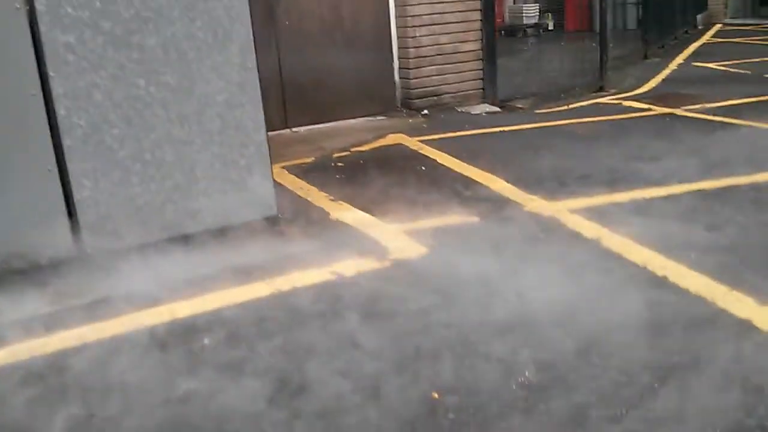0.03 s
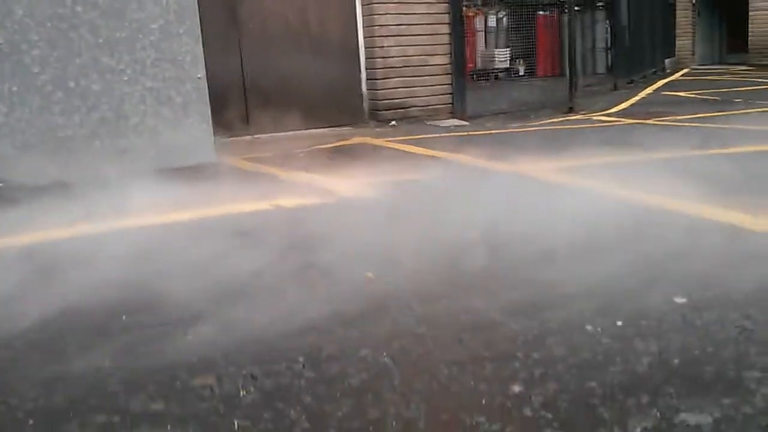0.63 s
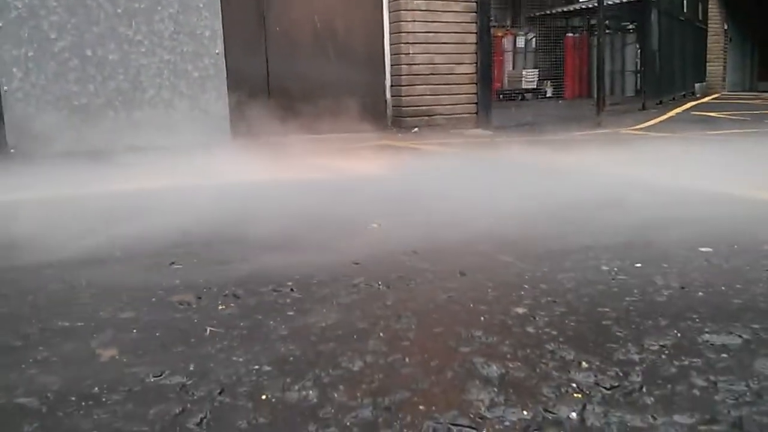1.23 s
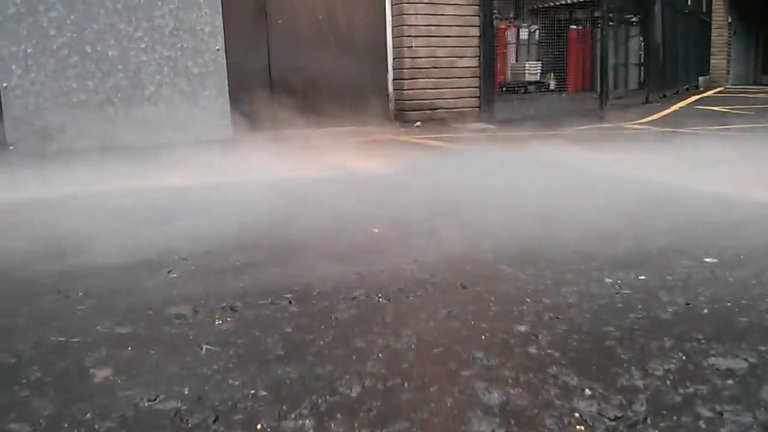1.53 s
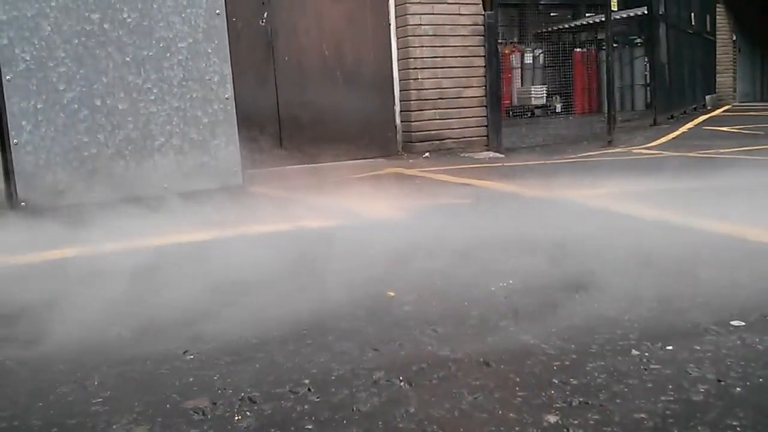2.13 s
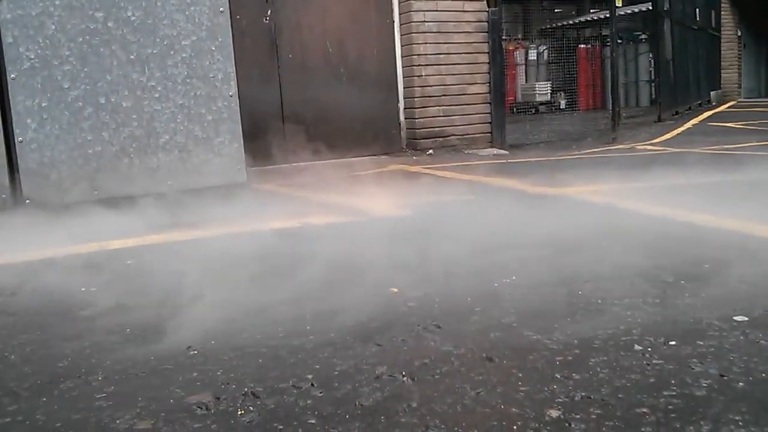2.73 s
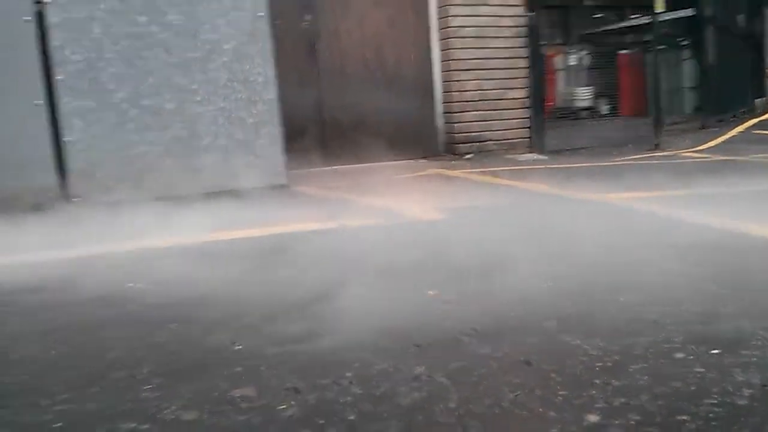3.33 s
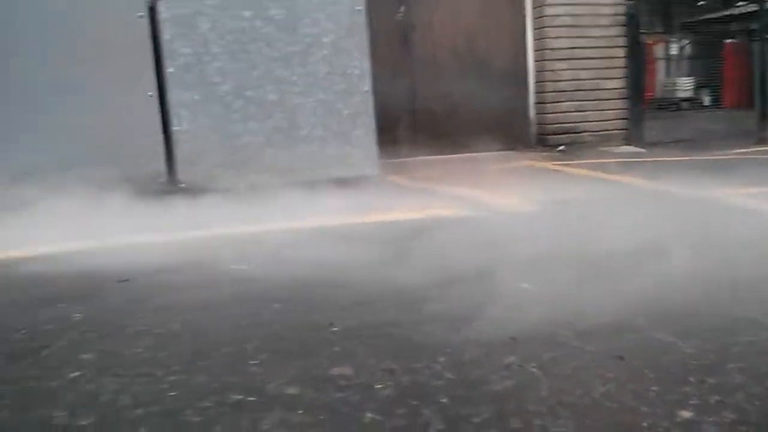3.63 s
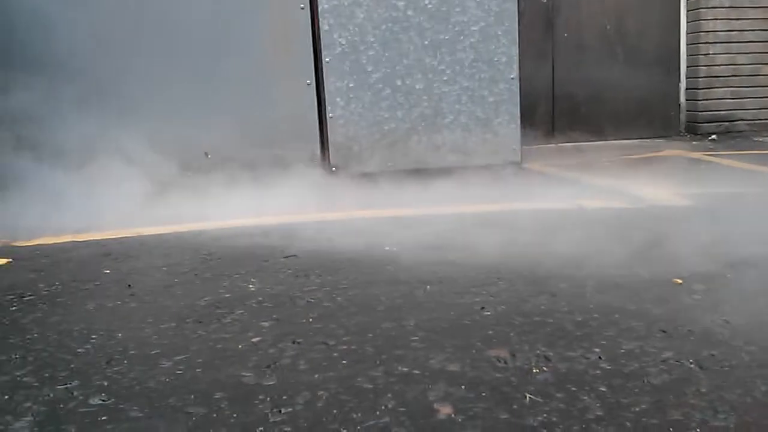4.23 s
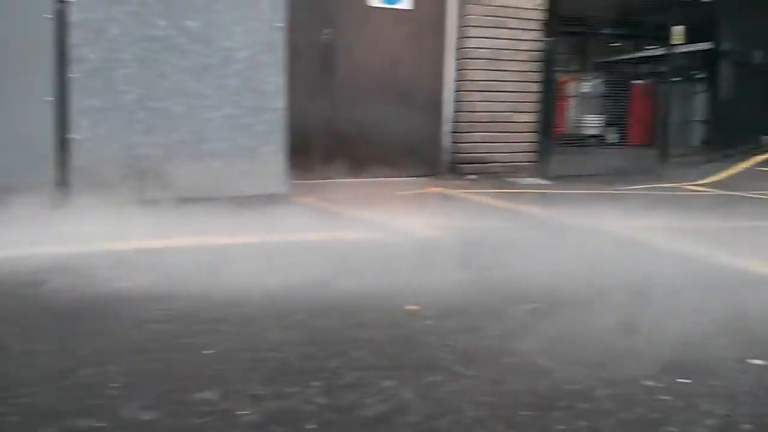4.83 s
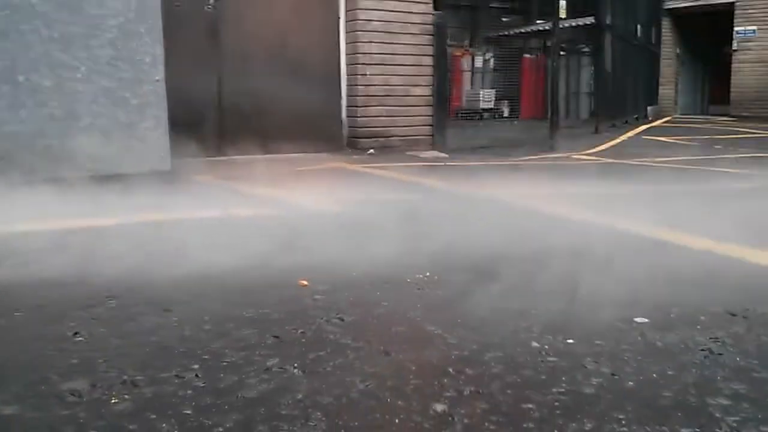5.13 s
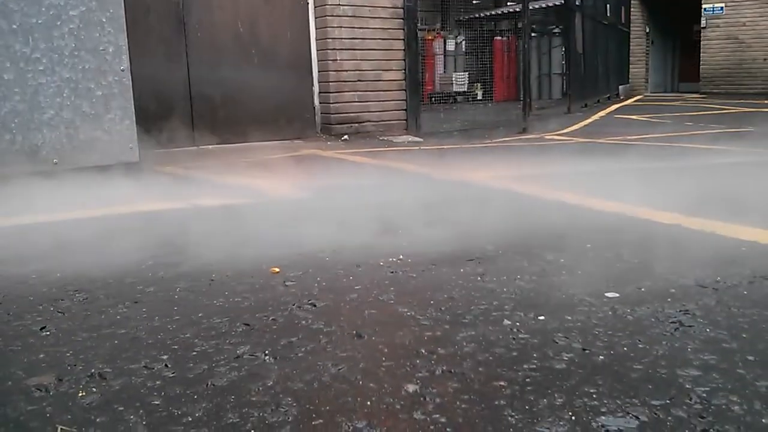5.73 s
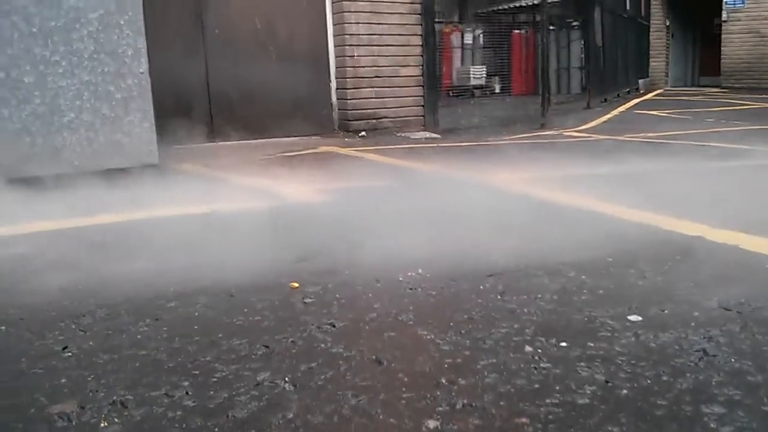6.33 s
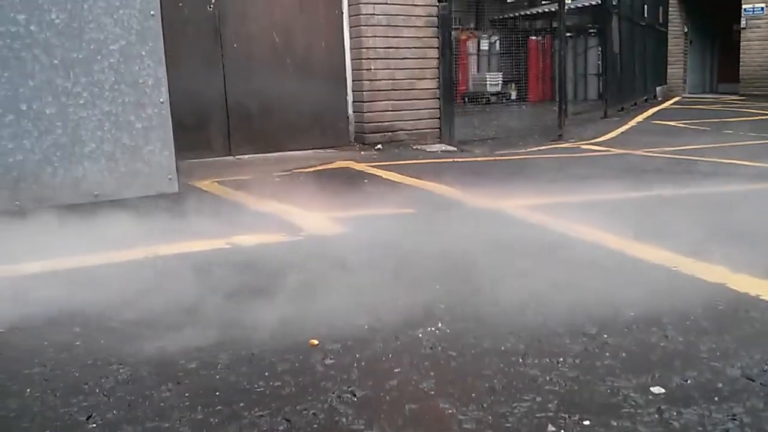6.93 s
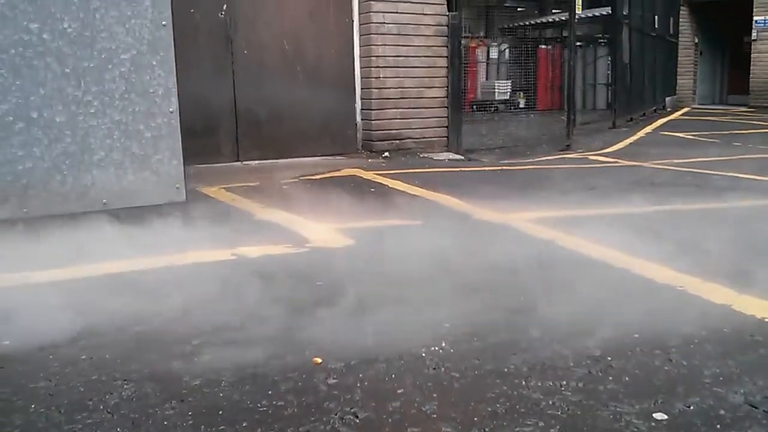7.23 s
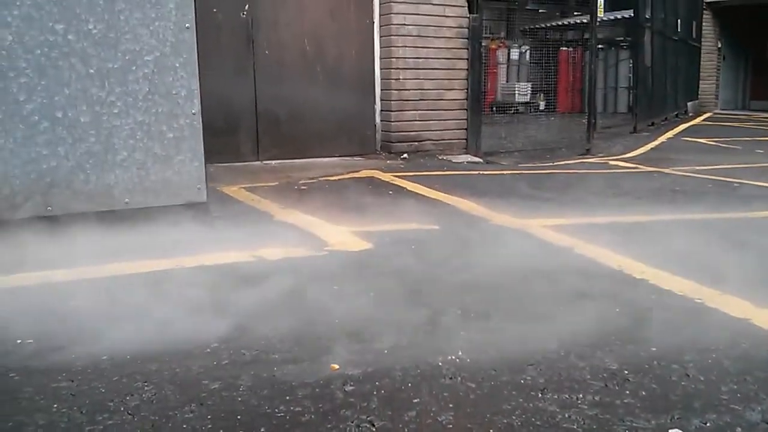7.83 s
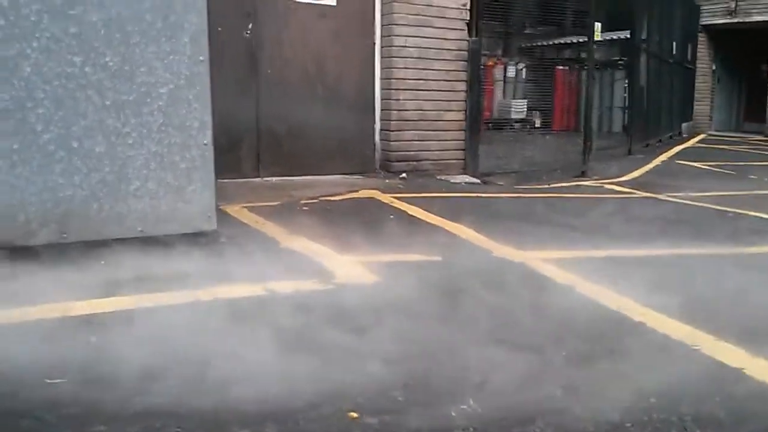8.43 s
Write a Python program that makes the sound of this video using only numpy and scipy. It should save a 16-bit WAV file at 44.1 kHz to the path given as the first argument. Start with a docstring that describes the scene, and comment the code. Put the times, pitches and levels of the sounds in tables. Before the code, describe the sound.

A steady, throbbing rumble and hum of fans and ducts fills a service yard, along with a faint high motor whine. In front, gas escapes from a tank with a bright hiss, strongest at first, when liquid sputters in the jet. After about a second the spray eases and the hiss flutters and swells unevenly, dotted with small sizzling spits that bounce off the walls. The spray rises again near the end.

```python
"""Cold gas vents from a tank and rolls as fog over a walled service yard. It opens with a blast of
hiss, spray and sputtering liquid; ventilation plant rumbles and hums behind it throughout, and a
motor drive's inverter whines thinly. From 1 s the spray dies back and the fizzing jet surges and
spits; now and then a duct booms. The sharpest spit comes at 7.3 s; after 8 s the spray picks up."""
import sys
import numpy as np
from scipy import signal
from scipy.fft import rfft, irfft
from scipy.io import wavfile

SR = 44100
rng = np.random.default_rng(int(sys.argv[2]) if len(sys.argv) > 2 else 0)


def int16_out(signal):
    """Quantize to a 16-bit WAV file."""
    q = np.round(np.clip(np.atleast_2d(signal).T, -1, 1) * 32767)
    wavfile.write(sys.argv[1], SR, q.astype(np.int16))


N = 373968

# hiss of the steady flow between surges: (time [s], level [dB])
FLOW_LEVEL = [(0, -57), (.9, -58.5), (1.6, -58.5), (2.5, -62), (3.0, -58), (3.6, -62.5), (4.05, -65.5),
              (4.7, -61.5), (5.18, -60), (5.4, -58), (6.5, -61), (7.1, -58.5), (7.8, -62.5), (8.48, -57.5)]
RISE_PER_FALL = 0.47   # rise time over fall time of surges and sputters


def vent(lift_db):
    """A fluttering jet with droplets in it; surges lift the hiss and, less so, a finer, brighter spray."""
    # jet hiss: (frequency [Hz], relative density [dB])
    hiss_spectrum = [(2500, -32), (3200, -35), (4000, -18.5), (4900, -13.5), (5700, -8.5), (6400, -8.5),
                     (7300, -2), (8200, 1.5), (9500, -4.5), (11000, -9.5), (12000, -13.5), (13000, -25),
                     (16000, -41)]
    # fine spray: (frequency [Hz], relative density [dB])
    spray_spectrum = [(3000, -6), (4000, -19), (4900, 1.5), (5700, 2.5), (8000, -2), (11000, 6), (13000, 4),
                      (16000, 3)]
    # fine spray before surges: (time [s], level [dB])
    spray_level = [(0, -61), (.2, -54), (.38, -55.5), (.54, -59.5), (.69, -56), (1.0, -66), (1.35, -71),
                   (2.4, -75), (2.95, -70), (3.6, -73), (4.0, -74), (4.42, -74), (4.6, -70), (5.25, -69),
                   (6.1, -70), (6.5, -73), (6.9, -69), (8.05, -71.5), (8.25, -59.5), (8.48, -65)]
    spray_follows = 0.15
    flutter_db = 0.66 * drift(39) + drift(23)
    jet = coloured(rng.standard_normal(N) + 0.36 * fizz(per_s=300, spread_db=4.6), hiss_spectrum)
    spray = coloured(rng.standard_normal(N) + 0.36 * fizz(per_s=500, spread_db=4.4), spray_spectrum)
    jet_db = in_time(FLOW_LEVEL) + lift_db + flutter_db
    spray_db = in_time(spray_level) + spray_follows * lift_db + flutter_db
    return jet * from_db(jet_db) + spray * from_db(spray_db)


def surge_lift_db():
    """Surges of gas add their power to the steady flow and so raise the hiss."""
    # surges: (crest time [s], level [dB], fall time [s])
    surges = [(.14, -50.5, 0.36), (.65, -55, .07), (1.45, -58.5, 0.19), (1.67, -62, 0.18),
              (2.29, -64, 0.11), (2.68, -60, 0.067), (2.77, -55, 0.089), (3.2, -64, .07), (3.42, -62, 0.06),
              (3.78, -66, 0.2), (4.32, -63, 0.088), (4.52, -61.5, .13), (4.9, -55, 0.079),
              (5.11, -60, 0.032), (5.3, -59, 0.11), (5.63, -67, 0.17), (6.13, -59, 0.14), (6.74, -62, .06),
              (6.87, -58.5, 0.14), (7.14, -62, 0.069), (7.38, -60, .08), (7.59, -61.5, 0.1),
              (8.19, -58.5, 0.15)]
    flow_db = in_time(FLOW_LEVEL)
    power = sum((from_db(db - flow_db) * swell(s, RISE_PER_FALL * fall_s, fall_s)) ** 2
                for s, db, fall_s in surges)
    return 10 * np.log10(1 + power)


def sputters():
    """Liquid caught in the jet crackles in short runs, lower and coarser than the hiss."""
    # runs of crackle: (crest time [s], level [dB], fall time [s])
    runs = [(.15, -53, 0.074), (.25, -55.5, 0.071), (.38, -57.5, 0.14), (.65, -65, .045), (1.45, -67, 0.14),
            (6.9, -65, 0.067), (8.4, -67, .12)]
    # crackle: (frequency [Hz], relative density [dB])
    spectrum = [(3200, -24), (4400, -8), (5200, 0), (5900, 4), (7000, 3.5), (8000, -13), (10000, -20),
                (13000, -28)]
    envelope = sum(from_db(db) * swell(s, RISE_PER_FALL * fall_s, fall_s) for s, db, fall_s in runs)
    crackle = coloured(rng.standard_normal(N) + 0.49 * fizz(per_s=440, spread_db=9.5), spectrum)
    return crackle * envelope * from_db(1.4 * drift(50))


def spits(crack_s, echo_db):
    """Each spit cracks, echoes round the yard and throws out a bright sizzle of droplets."""
    # spits: (time [s], onset level [dB], centre [Hz], width [octaves], sizzle level [dB])
    events = [(1.002, -55, 8800, .6, -78), (1.1015, -57, 12000, .3, -78), (1.3967, -52, 6460, 0.37, -80),
              (1.456, -52, 9300, .4, -80), (1.493, -52, 2330, 0.51, -85), (1.551, -53, 7500, .7, -80),
              (2.7464, -49, 7600, .75, -69), (2.756, -46, 9400, .45, -76), (3.1119, -63, 13000, .5, -73),
              (3.203, -52, 7840, 0.59, -76), (3.799, -49.5, 8300, .6, -66), (4.1151, -58, 8700, .5, -65),
              (5.0843, -55, 7000, .7, -78), (5.6611, -53, 10500, .35, -74), (5.738, -53, 5840, 0.43, -80),
              (5.928, -55.5, 5170, .18, -80), (6.112, -54, 9000, .5, -73), (6.828, -49, 9000, 0.5, -79),
              (6.8468, -53, 7500, .8, -75), (6.8912, -53, 6300, .4, -78), (6.927, -54, 6060, .35, -78),
              (7.337, -43, 8400, 0.42, -66.5)]
    # sizzle: (frequency [Hz], relative density [dB])
    sizzle_spectrum = [(5000, -17), (8000, -6), (11500, -3), (12800, -2), (14500, -2), (16000, -4)]
    sizzle_decay_s, sizzle_onset_db = 0.085, 7
    t = np.arange(SR // 2) / SR
    crack_shape = np.exp(-np.minimum((t / crack_s) ** 2, 40))
    sizzle_shape = from_db(sizzle_onset_db) * crack_shape + np.exp(-t / sizzle_decay_s)
    cracks, sizzle_gain = np.zeros(N), np.zeros(N)
    for s, db, hz, octaves, sizzle_db in events:
        edges_hz = np.clip([hz * 2 ** (-octaves / 2), hz * 2 ** (octaves / 2)], 100, 0.45 * SR)
        bandpass = signal.butter(2, edges_hz, "band", fs=SR, output="sos")
        band = rms_one(signal.sosfilt(bandpass, rng.standard_normal(len(t))))
        span = slice(round(s * SR), round(s * SR) + len(t))
        cracks[span] += from_db(db) * band * crack_shape
        sizzle_gain[span] += from_db(sizzle_db) * sizzle_shape
    echo = from_db(echo_db) * yard(cracks)
    sizzle = sizzle_gain * coloured(rng.standard_normal(N), sizzle_spectrum)
    return cracks + echo + sizzle


def fizz(per_s, spread_db):
    """Tiny droplets burst at random, in widely differing sizes; rms 1."""
    bursts = rng.random(N) < per_s / SR
    sizes = from_db(spread_db * np.minimum(rng.exponential(1, N), 4))
    return rms_one(bursts * sizes * rng.choice([-1, 1], N))


def yard(x, t60_s=0.59, delay_s=0.012):
    """Diffuse wall reflections arrive late and die away."""
    t = np.arange(SR) / SR
    tail = rng.standard_normal(SR) * from_db(-60 * t / t60_s) * (t > delay_s)
    return signal.fftconvolve(x, tail / np.sqrt(np.sum(tail ** 2)))[:N]


def ventilation_air():
    """Distant ventilation: a deep rumble under two bands of churning air."""
    # rumble: (frequency [Hz], relative density [dB])
    rumble_spectrum = [(15, -50), (28, -6), (46, 13.5), (62, 12), (85, 13.5), (130, 10.5), (200, -32)]
    # rumble: (time [s], level [dB])
    rumble_level = [(0, -48.5), (.7, -54), (1.5, -49), (2.7, -49.5), (3.7, -60), (4.55, -49), (5.7, -49.5),
                    (6.95, -52.5), (7.6, -51.5), (8.48, -47)]
    # low air rush: (frequency [Hz], relative density [dB])
    low_spectrum = [(200, -21), (420, 1.5), (560, 3), (780, 1.5), (1000, -3), (1250, -13), (1600, -41)]
    # low air rush: (time [s], level [dB])
    low_level = [(0, -52.5), (.9, -49.5), (2.3, -49.5), (3.6, -48), (4.35, -48.5), (4.7, -46.5), (5.1, -48),
                 (8.48, -48.5)]
    # high air rush: (frequency [Hz], relative density [dB])
    high_spectrum = [(900, -3), (1250, 1), (1600, 1), (2050, -3.5), (2400, -10), (2750, -21), (3200, -25),
                     (4000, -20)]
    # high air rush: (time [s], level [dB])
    high_level = [(0, -52.5), (.9, -58), (1.2, -54.5), (1.65, -57.5), (2.1, -57.5), (3.4, -56.5),
                  (4.1, -58.5), (4.45, -57), (4.8, -58), (5.4, -55.5), (6.2, -55.5), (6.8, -56.5),
                  (8.48, -56)]
    low = coloured(churning(spread_db=2.6, bands=24), low_spectrum)
    high = coloured(churning(spread_db=3.1, bands=34), high_spectrum)
    rumble = coloured(rng.standard_normal(N), rumble_spectrum)
    rumble *= from_db(in_time(rumble_level) + 1.4 * drift(11))
    low *= from_db(in_time(low_level) + 1.3 * drift(26))
    high *= from_db(in_time(high_level) + drift(5))
    return rumble + low + high


def duct_drone():
    """Air drones in ducts that the fans keep ringing; the ringing follows the drone's level."""
    # drone: (frequency [Hz], relative density [dB])
    spectrum = [(60, -9.5), (125, 4.5), (155, 1.5), (215, 2.5), (310, 0.5), (400, -7), (520, -12.5),
                (700, -19.5)]
    # drone: (time [s], level [dB])
    level = [(0, -49.5), (.4, -45), (.65, -41), (1.2, -42), (1.5, -40), (2.2, -41), (3.1, -41), (3.5, -40),
             (4.3, -42), (5.1, -44), (5.5, -40.5), (6.75, -43.5), (7.2, -45.5), (7.8, -42), (8.48, -43.5)]
    # duct resonances: (frequency [Hz], width [Hz], level at mean drone [dB])
    resonances = [(111.3, 7.4, -51.5), (151.7, 2.6, -59), (238, 18, -67), (274.8, 7.7, -56),
                  (341.5, 25, -53.5), (537.4, 24, -62.5), (1124, 43, -69.5)]
    drone_db = in_time(level)
    air = coloured(churning(spread_db=3.0, bands=5, top_hz=400), spectrum)
    ringing = sum(from_db(db) * narrow_noise(hz, width_hz) for hz, width_hz, db in resonances)
    return air * from_db(drone_db) + ringing * from_db(drone_db - np.mean(drone_db))


def duct_booms(swell_s=0.11):
    """Gusts in the ducts make one resonance swell and fade."""
    # booms: (crest time [s], frequency [Hz], level [dB])
    booms = [(.85, 325, -45), (1.15, 335, -46), (3.15, 276, -45), (4.35, 280, -42.5), (6.3, 290, -48),
             (6.75, 332, -40.5)]
    return sum(from_db(db) * swell(s, swell_s, swell_s) * tone(hz, width_hz=39, scatter=1.1)
               for s, hz, db in booms)


def fans(blade_hz, hum_hz=100, whistle_hz=1004):
    """Mains hum of the motors, the blade rate with its third harmonic, and a faint whistle."""
    # motor hum: (time [s], level [dB])
    motor_level = [(0, -49), (.35, -42), (1.5, -49), (2.1, -43.5), (3.15, -44), (3.5, -52.5), (4.1, -40),
                   (5.0, -50), (6.45, -47.5), (6.75, -72), (7.2, -64), (7.6, -45), (8.48, -51.5)]
    # blade hum: (time [s], level [dB])
    blade_level = [(0, -50), (.4, -54.5), (.8, -46), (1.2, -42), (1.5, -52), (1.8, -45.5), (2.9, -44.5),
                   (3.4, -58), (4.05, -39), (4.4, -53), (4.88, -40), (5.15, -45), (5.5, -44), (6.1, -49),
                   (6.7, -46), (7.15, -49), (8.1, -43), (8.48, -60)]
    # third blade harmonic: (time [s], level [dB])
    third_level = [(0, -67), (.8, -57), (4.0, -58), (5.0, -61), (5.45, -48), (6.0, -65), (6.3, -55),
                   (7.6, -55), (8.48, -66)]
    # whistle: (time [s], level [dB])
    whistle_level = [(0, -63), (.7, -71), (1.12, -67), (1.3, -59), (1.75, -61.5), (2.15, -56), (2.55, -59),
                     (3.1, -60.5), (4.05, -62), (4.4, -69), (8.48, -68)]
    motor = tone(hum_hz, width_hz=62, scatter=1.0) * from_db(in_time(motor_level))
    blades = tone(blade_hz, width_hz=29, scatter=1.0) * from_db(in_time(blade_level))
    third = tone(3 * blade_hz, width_hz=29, scatter=0.98) * from_db(in_time(third_level))
    whistle = tone(whistle_hz, width_hz=25, scatter=0.5) * from_db(in_time(whistle_level))
    return motor + blades + third + whistle


def inverter(lift_db, switching_hz=4000, carrier_db=-90.5):
    """Switching sidebands whine: the lower cluster flutters and flares, the upper swells with the hiss."""
    # sidebands above the switching rate: (frequency [Hz], relative level [dB])
    lower_tones = [(4398, -14), (4423, -7), (4437, -1), (4518, -12), (4558, -15)]
    # sidebands round twice that rate: (frequency [Hz], relative level [dB])
    upper_tones = [(7798, -5.5), (7918, -4), (7958, -8.5), (7998, -13.5), (8038, -8), (8079, -6.5),
                   (8197, -19)]
    # lower cluster between flares: (time [s], gain [dB])
    lower_gain = [(0, -80), (.6, -78), (1.1, -86), (2.5, -85), (3.05, -79), (3.7, -81), (4.05, -83),
                  (4.5, -88), (5.0, -84), (5.45, -70), (5.8, -77), (6.15, -74), (6.4, -85), (7.55, -86),
                  (7.9, -84), (8.48, -75)]
    # upper cluster before surges: (time [s], gain [dB])
    upper_gain = [(0, -72), (.15, -64), (.6, -67), (.86, -63), (1.02, -73), (1.16, -60), (1.27, -70),
                  (1.7, -63), (1.95, -70), (2.3, -63), (2.55, -74), (2.78, -63.5), (3.55, -75), (3.85, -70),
                  (4.1, -77), (4.52, -62.5), (5.1, -78), (5.45, -59), (5.88, -66.5), (6.2, -59.5),
                  (6.45, -67), (6.8, -62.5), (7.58, -61.5), (7.77, -66), (8.2, -63), (8.48, -68)]
    # flares of the lower cluster: (crest time [s], gain [dB])
    flares = [(.85, -84), (1.45, -82), (3.42, -86), (4.28, -78), (4.69, -71.5), (6.93, -76.5),
              (7.33, -70.5), (7.81, -70)]
    flare_s, upper_follows = 0.15, 0.81
    flaring = sum(from_db(db) * swell(s, flare_s, flare_s) for s, db in flares)
    lower = sum(from_db(db) * tone(hz, width_hz=80, scatter=0.8) for hz, db in lower_tones)
    upper = sum(from_db(db) * tone(hz, width_hz=14, scatter=0.51) for hz, db in upper_tones)
    flutter = from_db(1.2 * drift(16))
    carrier = from_db(carrier_db) * tone(switching_hz, width_hz=30, scatter=0.6)
    lower *= flutter * (from_db(in_time(lower_gain)) + flaring)
    upper *= from_db(in_time(upper_gain) + upper_follows * lift_db)
    return carrier + lower + upper


def churning(spread_db, bands, top_hz=3500, rate_hz=12):
    """Turbulent noise whose bands each swell and sink on their own."""
    hz = np.arange(N // 2 + 1) * SR / N
    band_of_bin = np.round(np.interp(np.sqrt(hz), np.sqrt([100, top_hz]), [0, bands - 1]))
    white = rfft(rng.standard_normal(N))
    return sum(irfft(white * (band_of_bin == k), N) * from_db(spread_db * np.minimum(drift(rate_hz), 2))
               for k in range(bands))


def tone(hz, width_hz, scatter):
    """A steady tone plus its share scattered by walls and moving air; rms 1."""
    direct = np.sqrt(2) * np.sin(2 * np.pi * (hz * np.arange(N) / SR + rng.random()))
    return rms_one(direct + scatter * narrow_noise(hz, width_hz))


def narrow_noise(hz, width_hz):
    """A resonance driven by turbulence, wandering in strength and phase; rms 1."""
    phase = 2 * np.pi * hz * np.arange(N) / SR
    return rms_one(drift(width_hz / 2) * np.cos(phase) + drift(width_hz / 2) * np.sin(phase))


def drift(rate_hz):
    """Smooth random wander, mostly slower than rate_hz; rms 1."""
    steps = np.arange(0, N + 64, 64)
    hz = np.arange(len(steps) // 2 + 1) * SR / N
    slow = irfft(rfft(rng.standard_normal(len(steps))) / (1 + (hz / rate_hz) ** 2), len(steps))
    return np.interp(np.arange(N), steps, rms_one(slow))


def coloured(x, spectrum):
    """Filter by (frequency [Hz], gain [dB]) points, falling 30 dB an octave above the last; rms 1."""
    hz, db = np.transpose(spectrum)
    octave = np.log2(np.maximum(np.arange(N // 2 + 1) * SR / N, 1))
    rolloff_db = -30 * np.maximum(octave - np.log2(hz[-1]), 0)
    gain_db = np.interp(octave, np.log2(hz), db) + rolloff_db
    return rms_one(irfft(rfft(x) * from_db(gain_db), N))


def swell(crest_s, rise_s, fall_s):
    """Gaussian rise to 1 and Gaussian fall."""
    t = np.arange(N) / SR - crest_s
    width_s = np.where(t < 0, rise_s, fall_s)
    return np.exp(-np.minimum((t / width_s) ** 2, 40))


def in_time(curve):
    """Interpolate (time [s], value) points to every sample."""
    return np.interp(np.arange(N) / SR, *np.transpose(curve))


def from_db(db):
    """Decibels to gain."""
    return 10 ** (np.asarray(db) / 20)


def rms_one(x):
    """Scale to unit rms."""
    return x / np.sqrt(np.mean(x ** 2) + 1e-20)


def scene():
    """The vent in front, machinery behind; uneven air flow makes drone and fans throb together."""
    throb = rms_one(from_db(1.2 * drift(16)))
    lift_db = surge_lift_db()
    gas = vent(lift_db) + sputters() + spits(crack_s=0.006, echo_db=-4)
    plant = ventilation_air() + throb * duct_drone() + duct_booms() + throb * fans(blade_hz=185.05)
    return (gas + plant + inverter(lift_db))[None]


def record(dry, cutoff_hz=15650):
    """Steep low-pass."""
    return signal.sosfilt(signal.ellip(12, 0.1, 80, cutoff_hz, fs=SR, output="sos"), dry)


dry = scene()
out = record(dry)
int16_out(out)
```